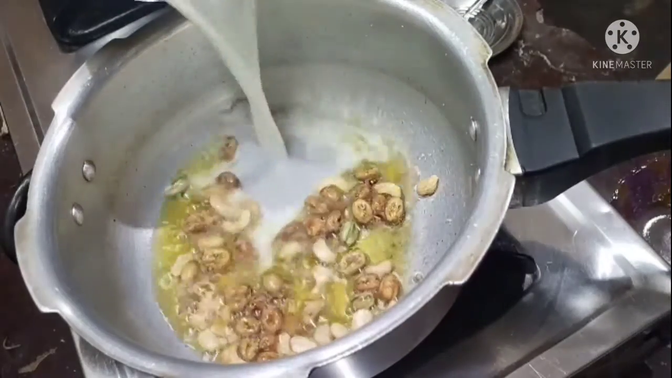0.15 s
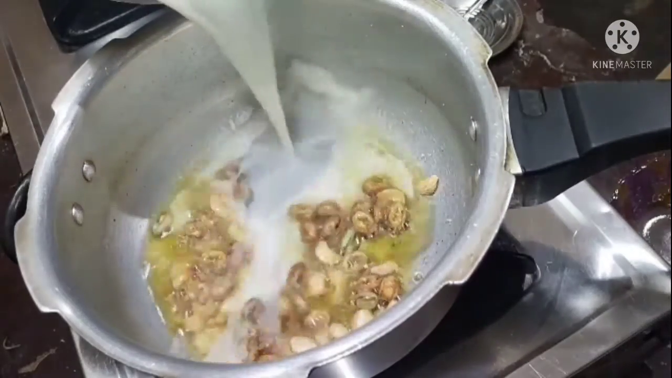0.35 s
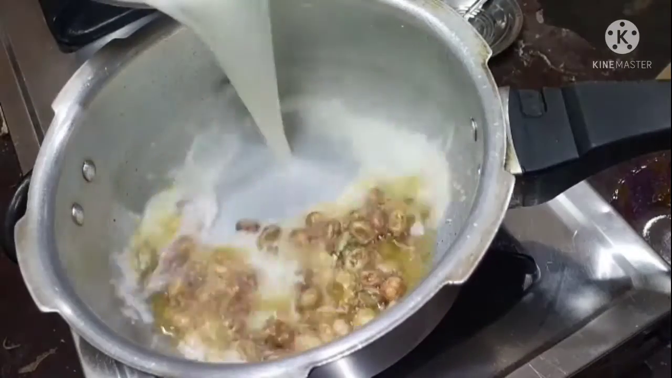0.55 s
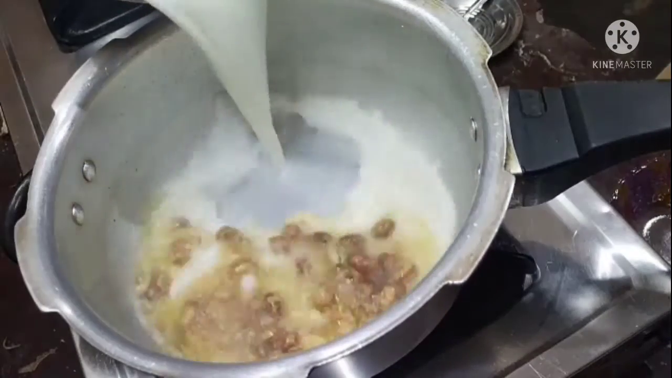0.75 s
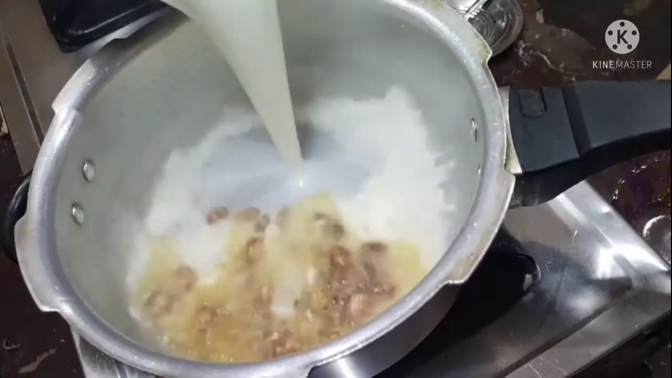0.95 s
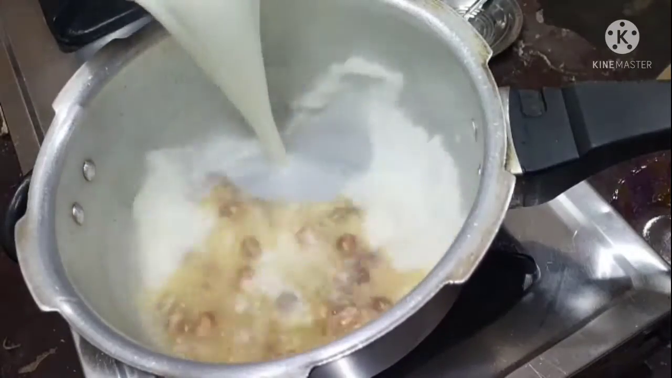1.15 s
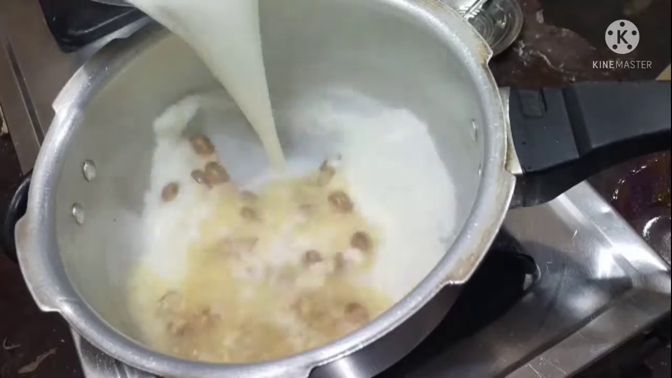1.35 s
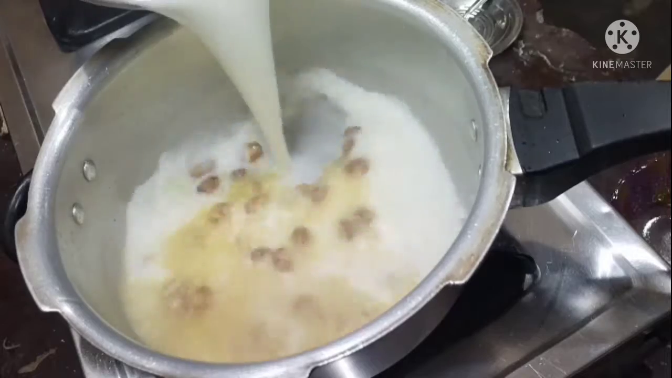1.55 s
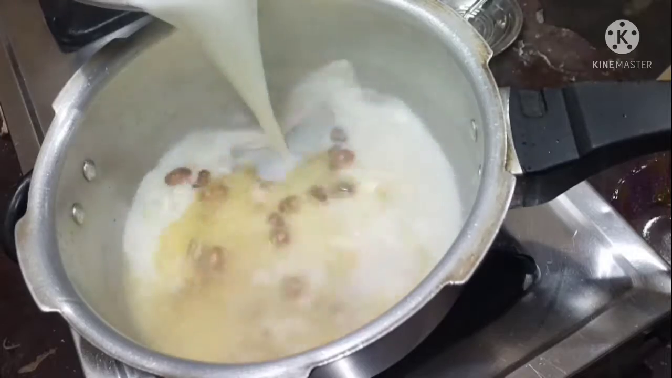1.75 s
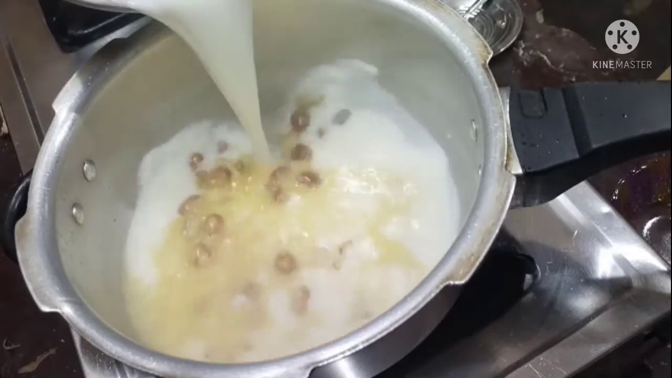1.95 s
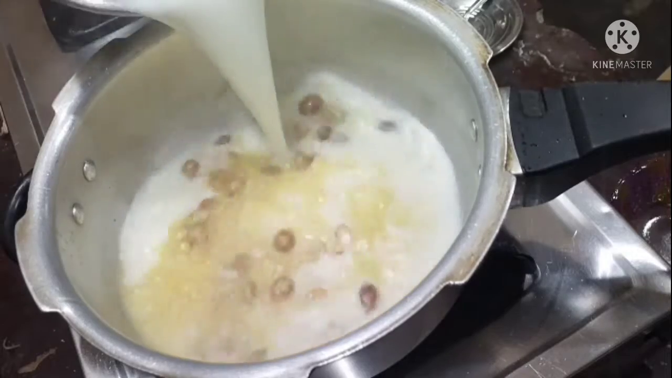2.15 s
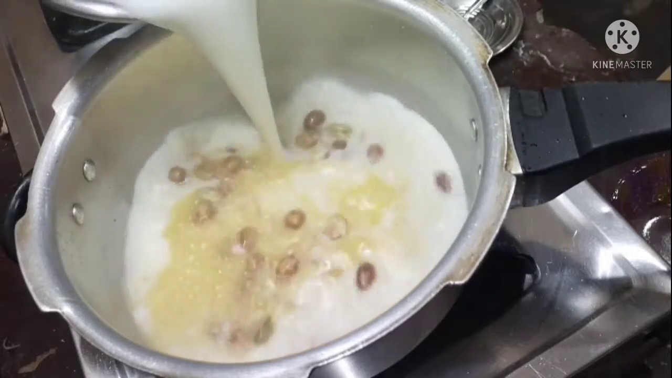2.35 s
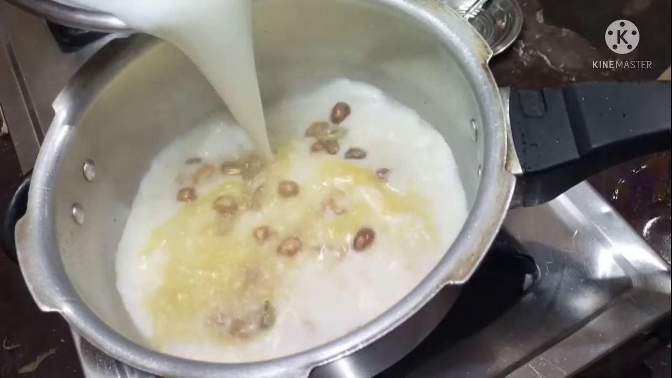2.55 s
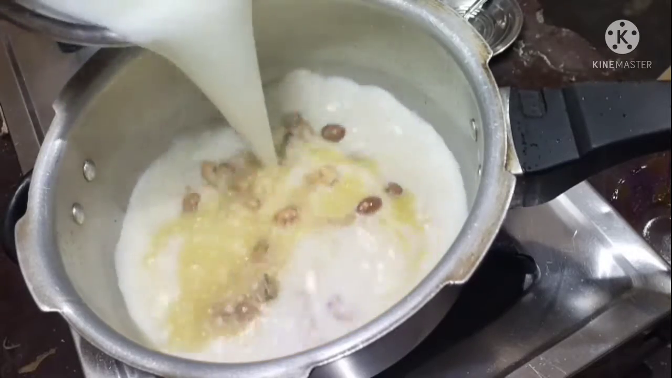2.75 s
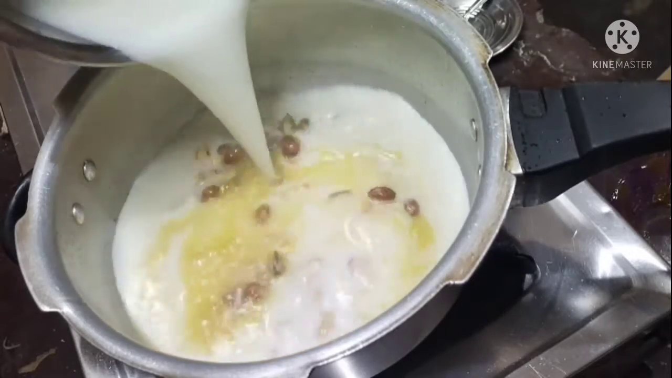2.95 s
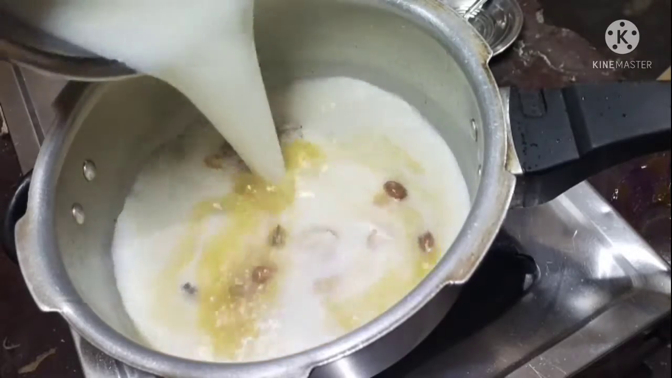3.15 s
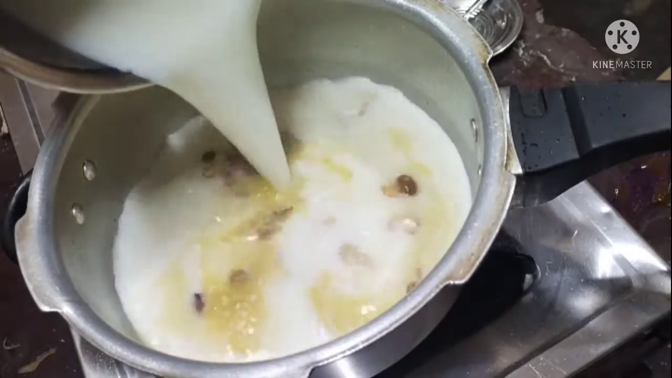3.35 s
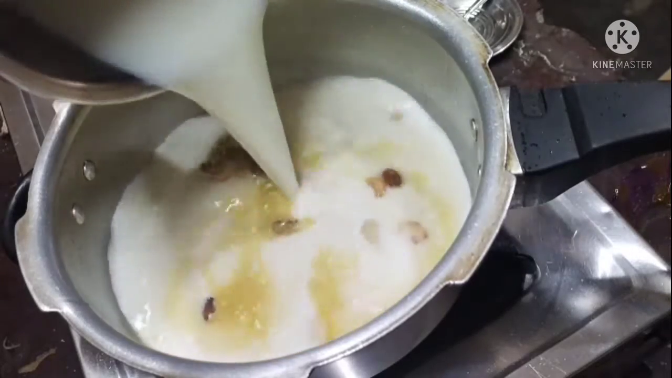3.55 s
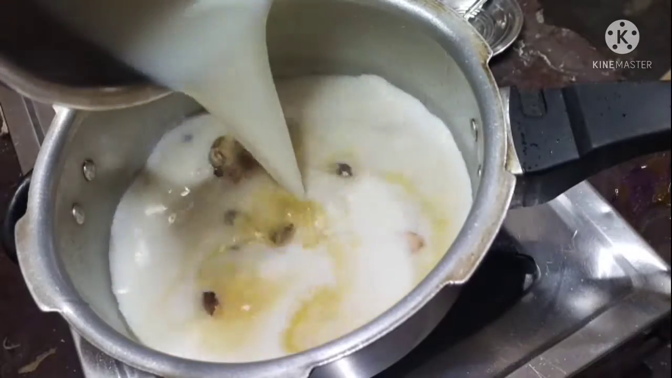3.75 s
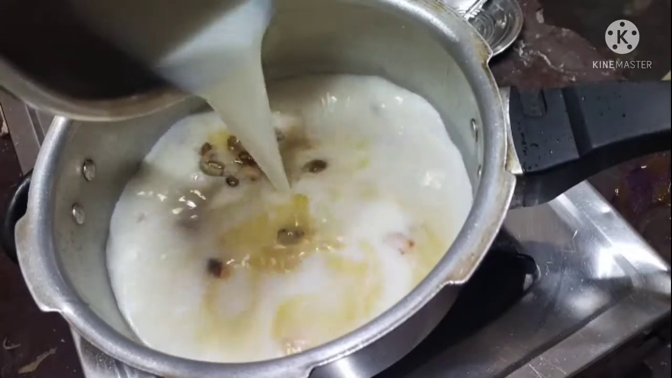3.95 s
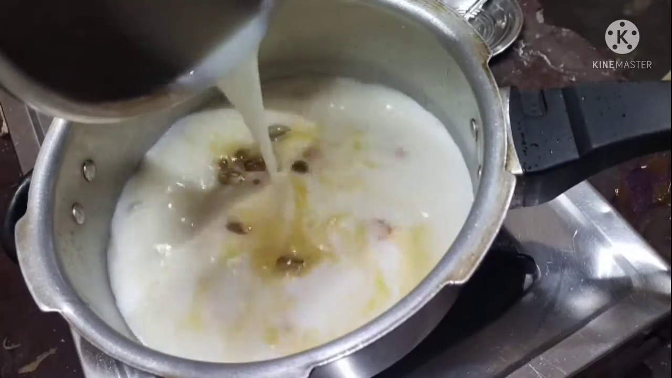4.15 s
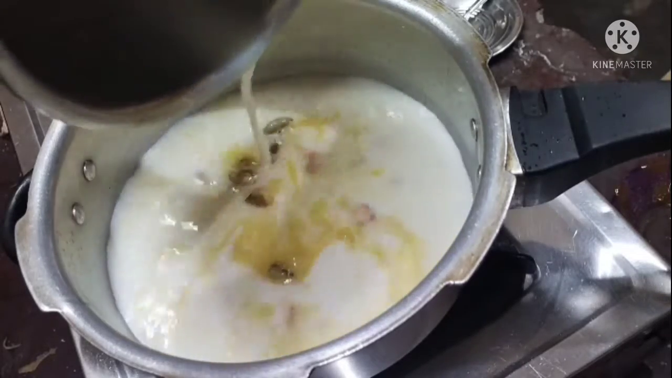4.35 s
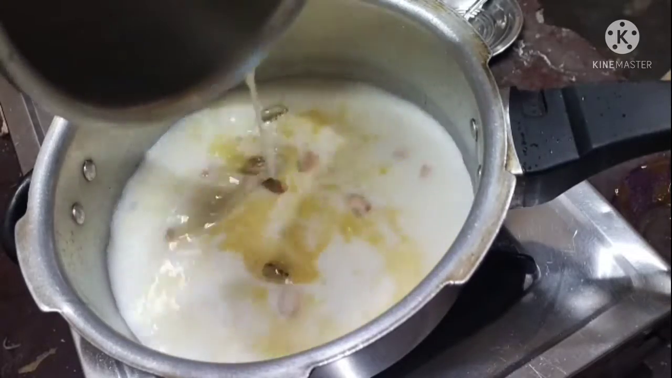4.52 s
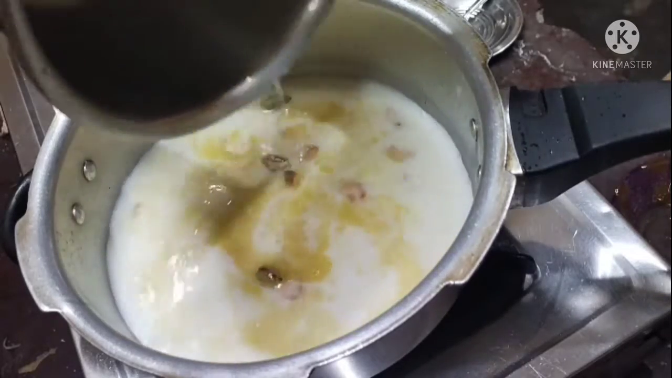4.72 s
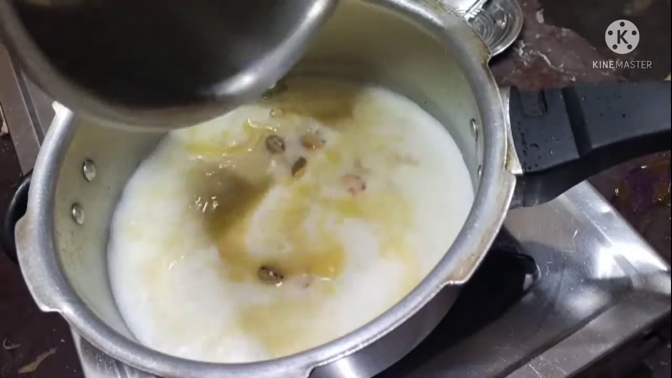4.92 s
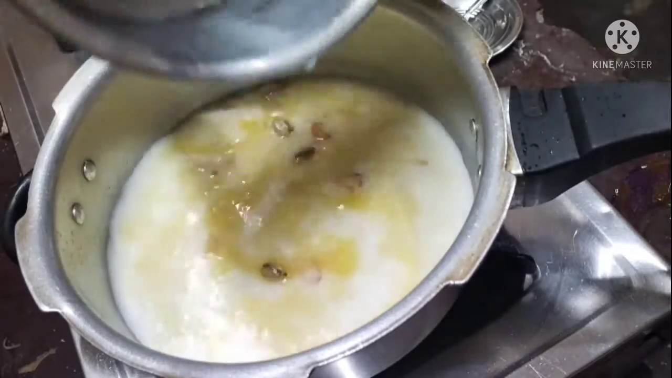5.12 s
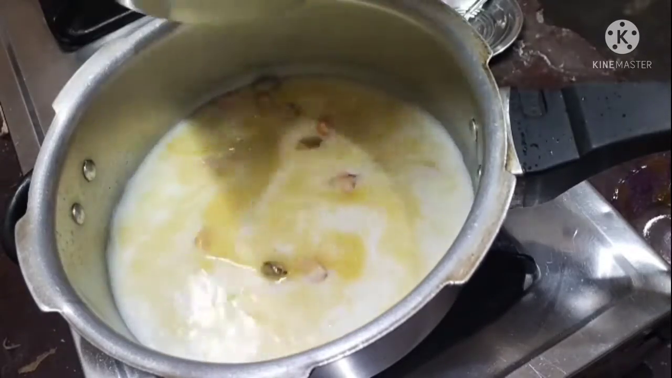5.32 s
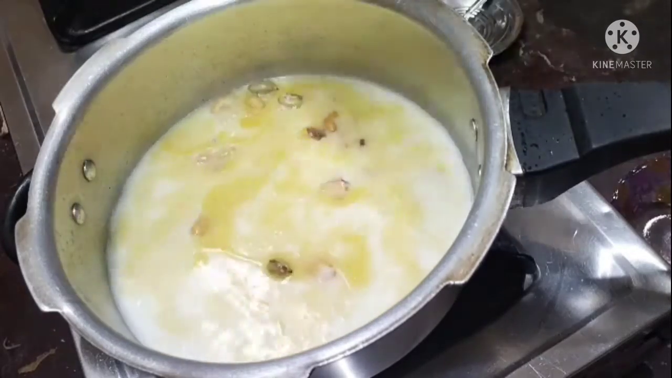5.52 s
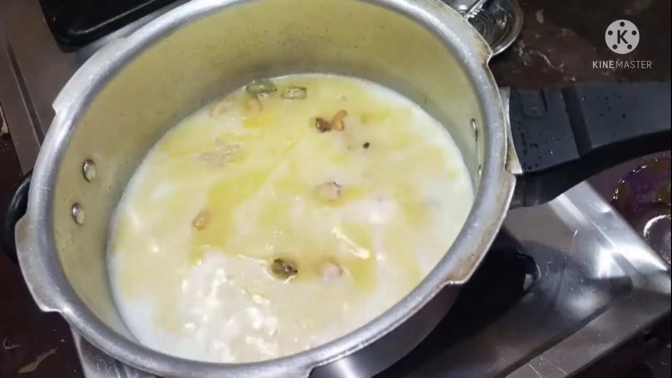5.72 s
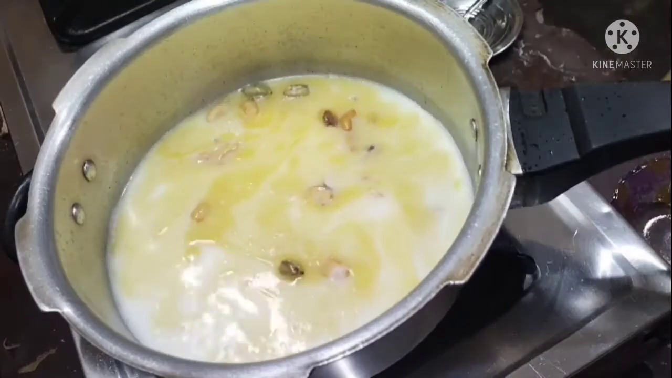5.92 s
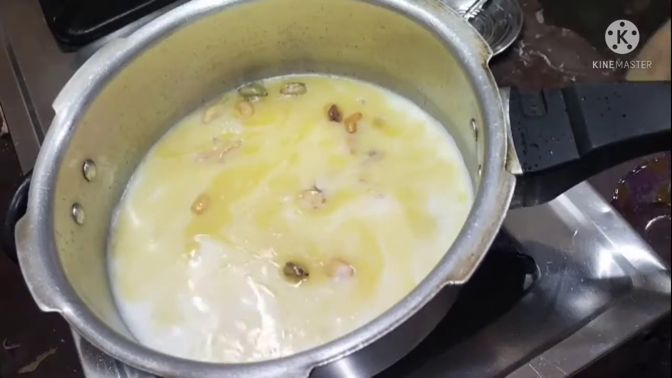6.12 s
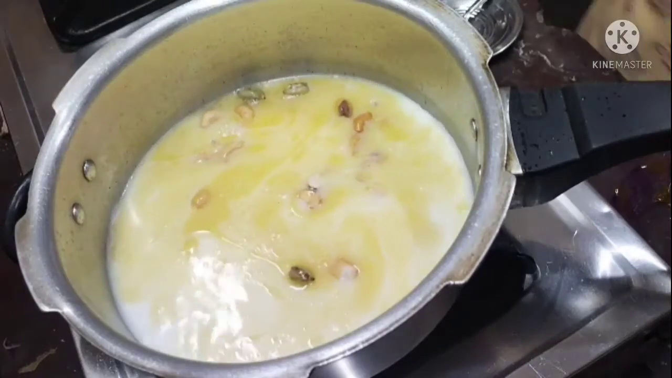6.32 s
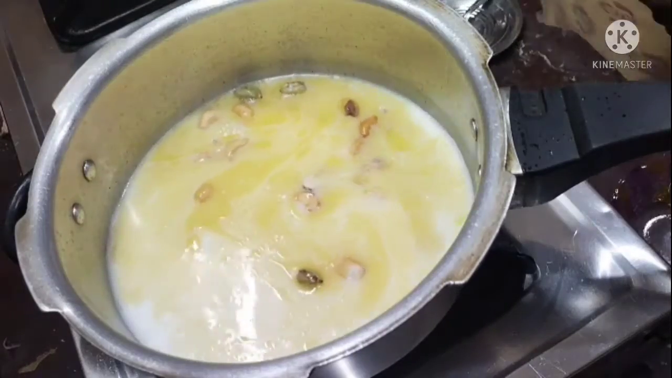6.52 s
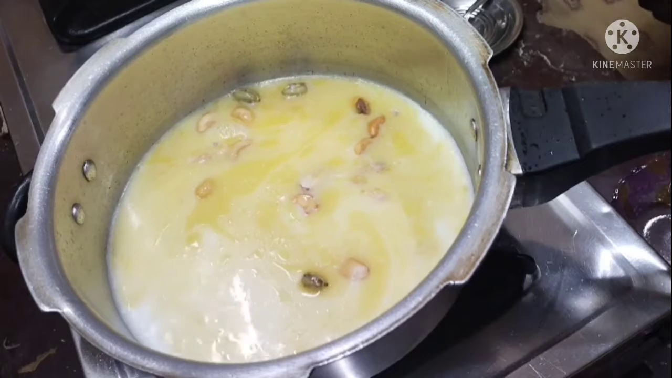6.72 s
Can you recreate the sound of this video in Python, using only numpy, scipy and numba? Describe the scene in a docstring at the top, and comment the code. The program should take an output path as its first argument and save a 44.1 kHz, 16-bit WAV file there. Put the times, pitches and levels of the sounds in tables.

```python
"""Milk is poured into hot fat in a deep steel pot on a stove, heard from above the rim.
At once steam bubbles burst in a dense fizz that rings the air of the pot, with splats and single pops.
Violent boiling rumbles through the stove until about 3 s. The fizz dies down as the milk cools the fat;
after 4 s the thinning stream gurgles twice. Near 5 s the emptied jug drones briefly as it is swung away,
and the stove top hums under the last bubbles."""
import sys
import numpy as np
from scipy import signal
from scipy.fft import rfft, irfft
from scipy.io import wavfile
from scipy.ndimage import uniform_filter1d
from numba import njit

SR = 44100
rng = np.random.default_rng(int(sys.argv[2]) if len(sys.argv) > 2 else 0)


def digitize_waveform(pressure):
    """Quantize a signal to 16-bit integers and store it at the path in sys.argv[1].

    Rows of a 2-D input are taken as channels; values are limited to [-1, 1].
    """
    field = np.atleast_2d(pressure).T
    bounded = np.clip(field, -1, 1)
    quanta = np.round(bounded * 32767).astype(np.int16)
    wavfile.write(sys.argv[1], SR, quanta)


N = 303408
TIME, HZ = np.arange(N) / SR, np.maximum(np.fft.rfftfreq(N, 1 / SR), 1)


def undb(db):
    """Decibels to gain."""
    return 10 ** (np.asarray(db) / 20)


def unit(x):
    """Scale to rms 1."""
    return x / np.sqrt(np.mean(x ** 2))


def curves(table):
    """One curve per value column, linear in time."""
    times, *cols = np.transpose(table)
    return [np.interp(TIME, times, col) for col in cols]


def over_hz(table):
    """(Hz, value) points joined on a log-frequency axis."""
    hz, value = np.transpose(table)
    return np.interp(np.log(HZ), np.log(hz), value)


def since(start_s):
    """Seconds elapsed, 0 before the start."""
    return np.maximum(TIME - start_s, 0)


def ramp(start_s, length_s):
    """Linear rise from 0 to 1."""
    return np.minimum(since(start_s) / length_s, 1)


def waver(rate_hz):
    """Random steps, smoothed twice, slow drift removed."""
    hold = int(SR / rate_hz)
    steps = np.repeat(rng.standard_normal(N // hold + 1), hold)
    smooth = uniform_filter1d(uniform_filter1d(steps, hold), hold)[:N]
    return .9 * (smooth - uniform_filter1d(smooth, 4 * hold))


@njit
def svf(x, g, damping):
    """State-variable band-pass per channel, gain 1 at the centre."""
    y = np.empty_like(x)
    for c in range(len(x)):
        band, low = 0., 0.
        for i in range(x.shape[1]):
            v = (band + g[i] * (x[c, i] - low)) / (1 + g[i] * (g[i] + damping[i]))
            band, low = 2 * v - band, low + 2 * g[i] * v
            y[c, i] = damping[i] * v
    return y


def bandpass(x, hz, width_hz):
    """Band-pass; centre and width may move."""
    ones = np.ones(x.shape[1])
    return svf(x, np.tan(np.pi * hz / SR) * ones, width_hz / hz * ones)


def ring(x, hz, width_hz):
    """Resonance; a second, wider pass steepens the flanks."""
    return bandpass(bandpass(x, hz, width_hz), hz, 2 * width_hz)


def drops(per_s=7.4, jump_db=3, fade_s=0.013):
    """Gain that jumps at each random drop and decays to 1."""
    hits = np.maximum(per_s / SR - rng.random(N), 0) * SR / per_s
    return 1 + undb(jump_db) * signal.lfilter([1], [1, -np.exp(-1 / (fade_s * SR))], hits)


def modes(x, table, flicker_db, rate_hz, pitch=1, widen=1, dripping=False):
    """Resonances of alternating sign; each flickers alone as the bubbling wanders."""
    pitch = np.broadcast_to(pitch, (len(table), N))
    out = 0
    for k, (hz, width_hz, db) in enumerate(table):
        gain = (-1) ** k * undb(db + flicker_db * waver(rate_hz))
        drive = x * drops() if dripping else x
        out = out + gain * ring(drive, hz * pitch[k], width_hz * widen)
    return unit(out)


# Coherence of the two microphone ports: (frequency [Hz], common power share [0-1])
COHERENCE = [(60, 0.87), (300, 0.82), (700, 0.85), (1000, 0.58), (1500, 0.33), (3000, 0.19), (6000, 0.16),
             (14000, 0.043)]
LEFT_LAG_S = 0.00017

def bursts(spread_db):
    """Noise of uneven bursts at two ports: bass mostly common and later on the left, treble unrelated."""
    noise = rng.standard_normal((3, N)) * undb(spread_db * rng.standard_normal((3, N)))
    common, left, right = rfft(noise)
    share = over_hz(COHERENCE)
    lag = np.exp(-2j * np.pi * HZ * LEFT_LAG_S)
    shared = np.sqrt(share) * np.array([common * lag, common])
    separate = np.sqrt(1 - share) * np.array([left, right])
    return unit(irfft(shared + separate, N))


# Kitchen noise spectrum: (frequency [Hz], relative density [dB])
KITCHEN_SPECTRUM = [(25, -18), (60, -3), (100, -15), (200, -10), (400, -5), (1000, -17), (4000, -31)]

def kitchen(level_db=-74.5):
    """Faint, steady, dark room noise."""
    spectrum = rfft(bursts(spread_db=3.5)) * undb(over_hz(KITCHEN_SPECTRUM))
    return undb(level_db) * unit(irfft(spectrum, N))


# Stove top and grate resonances: (frequency [Hz], width [Hz], gain [dB])
STOVE_MODES = [(55, 70, -24), (99.8, 10.7, 0), (124.5, 8, -5), (145, 12.6, -7)]
GRATE_MODES = [(189, 27, 2), (288.6, 33, -5), (355, 63, -8)]
# Late hum of the stove top: (time [s], level [dB])
STOVE_HUM = [(4.3, -86), (5.3, -76), (5.55, -64.5), (5.9, -71.5), (6.88, -71)]
SWING_S, SWING_RISE_S = 4.97, 0.06

def stove_rumble(boil_db=-53.5, sag_db=-16, stove_floor_db=-81, grate_floor_db=-74.5):
    """Boiling shakes stove top and grate, sags and stops; the jug's swing shakes the grate again."""
    x = bursts(spread_db=2.5)
    boil = undb(boil_db + sag_db * ramp(2.16, .83) + 3.5 * waver(4.1))
    boil *= ramp(.17, .085) ** 2 * (1 - ramp(2.99, .12)) ** 2
    buzz = undb(grate_floor_db + 5 * (1 - ramp(3.67, .5)))  # lingers while the milk pours
    shake = undb(-63) * ramp(SWING_S, SWING_RISE_S) * (1 - ramp(5.64, .053))
    hum = undb(stove_floor_db) + undb(curves(STOVE_HUM)[0])
    stove = (boil + hum) * modes(x, STOVE_MODES, flicker_db=3.2, rate_hz=5.3)
    grate = (undb(1) * boil + buzz + shake) * modes(x, GRATE_MODES, flicker_db=2.9, rate_hz=6.2)
    return stove + grate


def jug(note_hz=282.3, drone_db=-49, peak_s=5.21, cut_s=5.48, rush_db=-46.5):
    """Air in the empty jug drones under a rush that sinks and fades as the jug turns away."""
    x = bursts(spread_db=2.0)
    rush_hz = np.maximum(645 - 440 * since(SWING_S), 250)
    rush = unit(ring(x, rush_hz, 110)) + undb(-2) * unit(ring(x, 0.56 * rush_hz, 140))
    rush *= undb(rush_db - 44 * since(SWING_S))
    tone = np.sin(2 * np.pi * np.cumsum(note_hz * (1 + .015 * waver(25))) / SR)
    drone = unit(unit(ring(x, note_hz, 20)) + undb(-2) * tone)
    drone *= undb(drone_db - 150 * np.maximum(peak_s - TIME, 0) - 32 * since(peak_s) - 120 * since(cut_s))
    return ramp(SWING_S, SWING_RISE_S) ** 2 * (drone + rush)


# Gurgles: (time [s], level [dB], pitch [Hz], half-length [s])
GURGLE_EVENTS = [(4.163, -55.5, 463, 0.038), (4.462, -60, 452, 0.037)]

def gurgles(width_hz=62):
    """The thinning stream gurgles: soft swells of noise in a narrow, low resonance."""
    x = bursts(spread_db=3.5)
    return sum(undb(db) * np.exp(-2 * ((TIME - s) / half_s) ** 2) * unit(ring(x, hz, width_hz))
               for s, db, hz, half_s in GURGLE_EVENTS)


# Splats: (time [s], level before halving [dB], centre [Hz])
SPLAT_EVENTS = [(.257, -30, 1300), (.483, -17, 800), (.584, -28, 700), (.986, -16, 1800), (4.65, -37, 620)]

def splats(rise_s=0.0032, t60_s=0.062):
    """Milk hits hot fat: broad noise bursts with a fast rise and decay."""
    out = np.zeros(N)
    t = np.arange(int(t60_s * SR)) / SR
    for s, db, hz in SPLAT_EVENTS:
        i = int(s * SR)
        noise = unit(bandpass(rng.standard_normal((1, len(t))), hz, width_hz=1.1 * hz))[0]
        out[i:i + len(t)] += noise * undb(db - 60 * t / t60_s) * np.minimum(t / rise_s, 1) / 2
    return np.array([np.roll(out, int(LEFT_LAG_S * SR)), out])


# Large bubbles: (time [s], level [dB], pitch [Hz])
POP_EVENTS = [(.257, -23, 2020), (.352, -21.5, 1330), (.428, -27, 747), (.587, -24.5, 730),
              (.789, -17, 2050), (.986, -17, 2080), (1.203, -26, 736), (1.387, -27, 1490),
              (1.492, -29, 790), (2.829, -36.5, 826), (3.13, -37, 1400), (3.41, -36, 1950),
              (3.55, -38, 2060), (3.67, -38, 3300), (3.87, -42, 3300), (4.674, -38, 740), (4.74, -40, 1350),
              (4.795, -39.5, 820)]

def pops(rise_s=0.00047, t60_s=0.077):
    """Large bubbles pop singly, each a damped sine."""
    out = np.zeros(N)
    t = np.arange(int(t60_s * SR)) / SR
    for s, db, hz in POP_EVENTS:
        i = int(s * SR)
        envelope = undb(db - 60 * t / t60_s) * (1 - np.exp(-t / rise_s))
        out[i:i + len(t)] += envelope * np.sin(2 * np.pi * hz * t)
    return np.array([np.roll(out, int(LEFT_LAG_S * SR)), out])


# Cross modes of the pot air; third pot note, a close pair: (frequency [Hz], width [Hz], gain [dB])
CROSS_MODES = [(2607, 214, -1), (2927, 120, -13), (3262, 200, -1.5), (3570, 120, -7), (3877, 240, -2),
               (4487, 280, -3), (5080, 210, -6.5), (5730, 140, -8.5), (6500, 190, -14.5)]
THIRD_MODES = [(1950, 100, 0), (2092, 94, -0.5)]
# Cross modes as the pot fills and calms: (time [s], pitch shift [%], width factor [1])
CROSS_DRIFT = [(0, 0., .6), (.4, 2., 1.3), (1.5, 0.58, 1.2), (2.7, 0.74, 0.77), (3.7, 1.3, 0.84),
               (5, 0.053, 0.76), (6, 0.33, 0.71), (6.88, -.2, 0.64)]
# Opening of the pair: (time [s], shift each way [%])
THIRD_SPREAD = [(0, -1), (.7, -1.5), (1.5, -0.4), (3.7, .6), (5.2, 0.6), (6.3, -0.3), (6.88, -0.5)]
# Metallic note of the stream: (time [s], pitch [Hz], level re cross modes [dB])
STREAM_RING = [(0, 3230, -1), (.2, 3260, -7), (.6, 3380, -8), (1.2, 3330, -20), (3.7, 3300, -11),
               (4.6, 3280, -23)]

def upper_notes(x, third_db):
    """Bubbles and drops ring the high air modes; the stream hitting the pot adds a metallic note."""
    shift_pct, widen = curves(CROSS_DRIFT)
    cross = modes(x, CROSS_MODES, 2.9, 9, pitch=1 + shift_pct / 100, widen=widen, dripping=True)
    pair_pitch = 1 + np.outer([-1, 1], curves(THIRD_SPREAD)[0]) / 100
    third = undb(third_db) * modes(x, THIRD_MODES, 3.8, 10, pitch=pair_pitch, dripping=True)
    stream_hz, stream_db = curves(STREAM_RING)
    stream = undb(stream_db + 3 * waver(12)) * unit(ring(x * drops(), stream_hz, 120))
    return cross + third + stream


# Swells and dips of a pot note: (time [s], note [0 lowest, 1 second], gain [dB], half-length [s])
SLOSHES = [(.36, 1, -0.5, 0.054), (0.585, 0, -2, 0.051), (5.07, 0, 3.5, 0.09), (5.446, 1, 2.5, 0.068),
           (5.618, 0, 7.5, 0.18), (5.995, 0, 4.5, 0.074)]

def slosh_db(note):
    """Sloshing milk swells or dips one pot note, over a slight waver."""
    swell_db = sum(db * np.exp(-2 * ((TIME - s) / half_s) ** 2)
                   for s, which, db, half_s in SLOSHES if round(which) == note)
    return swell_db + 0.5 * waver(12)


# Milk surface: (time [s], churn [dB], lowest note [Hz], spray [dB], third note [dB])
SURFACE_STATE = [(0, 0, 718, -1, -4.5), (.6, 3.5, 730, 5.5, -2), (1.6, 1.5, 738, 6.5, -1),
                 (2.6, 1.5, 738, 5, -2), (3.5, -3, 763, 0, -5), (4.1, -8.5, 793, -2, -5),
                 (4.6, -9, 834, 0, -5.5), (5.3, -11, 780, -2.5, -5.5), (5.6, -7.5, 742, -2, -6),
                 (6.2, -6, 740, -3.5, -5.5), (6.88, -9, 720, -9, -5.5)]
# Pot wall rings; second pot note, split by the wall: (frequency [Hz], width [Hz], gain [dB])
WALL_MODES = [(455.5, 55, -5.5), (567.4, 51, -2.5), (665.3, 20.5, 3), (736.4, 13.4, 5.5), (766.6, 14, -5.5),
              (841, 27, -3.5)]
SECOND_MODES = [(1304, 183, 0), (1483, 62, 0.5), (1608, 56, 1), (1726, 44, -8.5)]

def pot(upper_db, second_db, lowest_db, note_width_hz=150):
    """Coarse bubbles ring the air of the pot; churning adds broad splash and shakes the wall."""
    churn_db, note_hz, spray_db, third_db = curves(SURFACE_STATE)
    x, spray = bursts(spread_db=1.5), bursts(spread_db=1.5)
    splash = undb(spray_db) * unit(ring(ring(spray, 2520, 3460), 2520, 3460))
    splash += undb(-9.5 + 1.6 * churn_db) * unit(ring(spray, 1022, 200))  # between the two lowest notes
    upper = upper_notes(x, third_db) + splash
    lowest = unit(ring(ring(x, note_hz, note_width_hz), note_hz, note_width_hz))
    lowest *= undb(0.65 * waver(6.4))
    wall = undb(churn_db) * modes(x, WALL_MODES, flicker_db=2.9, rate_hz=5.85)
    second = modes(x, SECOND_MODES, flicker_db=1.3, rate_hz=9, dripping=True)
    second = ring(second, 1400, 660)  # keeps the gap below it dark
    return (undb(upper_db) * unit(upper) + undb(second_db) * unit(second)
            + undb(lowest_db) * unit(lowest + wall))


# Fizz spectrum: (frequency [Hz], relative density [dB])
FIZZ_SPECTRUM = [(2500, -5), (4000, -2), (6000, -2), (9000, -1.5), (12000, -7), (15500, -16)]

def fizz(cooling_db):
    """Finest bubbles: third-octave bands swell together, flicker alone; both ends thin as the fat cools."""
    spectrum = rfft(bursts(spread_db=3.0)) * undb(over_hz(FIZZ_SPECTRUM))
    swell_db = .5 * waver(10)
    out = 0
    for hz in 2500 * 2 ** (np.arange(9) / 3):
        band = np.cos(np.pi / 2 * np.clip(3 * np.log2(HZ / hz), -1, 1)) ** 2
        thin_db = cooling_db * (0.18 * max(np.log2(hz / 8000), 0) + 0.071 * max(np.log2(5000 / hz), 0))
        flicker_db = 1.13 * waver(7) + 0.84 * waver(20)
        out = out + undb(thin_db + swell_db + flicker_db) * irfft(spectrum * band, N)
    return unit(out)


# Sizzle, pot notes re fizz: (time [s], fizz [dB], upper notes [dB], second note [dB], lowest note [dB])
SIZZLE_LEVELS = [(0, -28, -10, -17, -19.5), (.13, -26.5, -8, -15, -19), (.21, -26, -6, -12.5, -13),
                 (.26, -26, -3, -6.5, -14.5), (.33, -26.5, -2.5, -5.5, -13), (.45, -26.5, -3.5, -12, -13.5),
                 (.8, -25.5, -4, -9.5, -13), (1.25, -26, -4.5, -8, -11.5), (1.4, -27.5, -1.5, -6, -9.5),
                 (1.6, -27.5, -2.5, -3.5, -10.5), (1.9, -27.5, -3.5, -6, -11.5),
                 (2.15, -28.5, -3.5, -9, -11.5), (2.35, -30, -4, -11, -14), (2.53, -29, -4.5, -11.5, -16),
                 (2.62, -30.5, -6.5, -10, -15), (2.8, -31, -6.5, -13.5, -16.5),
                 (3.1, -34.5, -4.5, -11, -16), (3.85, -37, 0, -10, -17), (4.05, -38, -1.5, -10.5, -18),
                 (4.7, -40.5, 0.5, -8.5, -10.5), (5.3, -44.5, 3, -8.5, -14.5),
                 (5.9, -48.5, 5.5, -9.5, -14.5), (6.1, -49.5, 5, -9.5, -11), (6.55, -56, 8, -9, -9.5),
                 (6.88, -58, 8.5, -10, -16)]

def sizzle(surge_db=0.61):
    """Steam bubbles: fizz and pot notes follow the heat left in the fat."""
    fizz_db, upper_db, second_db, lowest_db = curves(SIZZLE_LEVELS)
    gain = undb(fizz_db + surge_db * waver(10))
    fine = fizz(cooling_db=fizz_db - fizz_db.max())
    coarse = pot(upper_db, second_db + slosh_db(note=1), lowest_db + slosh_db(note=0))
    return gain * (fine + coarse)


def room(x, t60_s=.25, tail_db=-14, gap_s=.004):
    """Tiled walls add a short noisy tail, a separate one at each port."""
    t = np.arange(int(.4 * SR)) / SR
    tail = rng.standard_normal((2, len(t))) * undb(-60 * t / t60_s) * (t > gap_s)
    tail = undb(tail_db) * tail / np.sqrt(np.sum(tail ** 2, axis=1, keepdims=True))
    return x + signal.fftconvolve(x, tail, axes=1)[:, :N]


def scene():
    """Kitchen noise, the pour with its reflections, stove and jug."""
    return kitchen() + room(sizzle() + pops() + splats() + gurgles()) + stove_rumble() + jug()


# Microphone port responses: (frequency [Hz], gain [dB])
LEFT_PORT = [(60, 0.5), (400, 1.5), (1500, 2), (5000, 2.5), (7300, 4), (9000, -1.5), (11000, -3),
             (15000, 3)]
RIGHT_PORT = [(60, 1.4), (400, 3.6), (1500, 3.77), (5000, 3.5), (7600, 0.85), (8300, 4.7), (9000, 11.7),
              (9800, 7.8), (11500, 2.6), (15000, 4.8)]

def record(dry, top_hz=15400):
    """Each port colours the sound, the right with a cavity peak; a steep low-pass follows."""
    ports = irfft(rfft(dry) * undb([over_hz(LEFT_PORT), over_hz(RIGHT_PORT)]), N)
    return signal.sosfilt(signal.ellip(16, .5, 70, top_hz, fs=SR, output="sos"), ports)


dry = scene()
out = record(dry)
digitize_waveform(out)
```